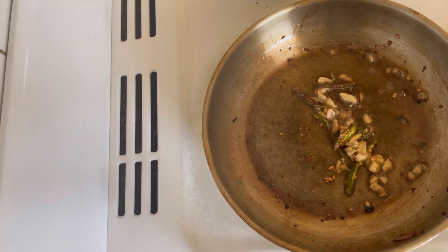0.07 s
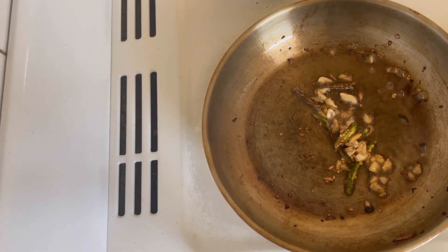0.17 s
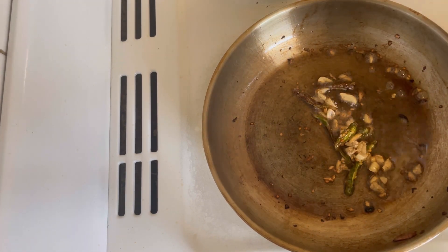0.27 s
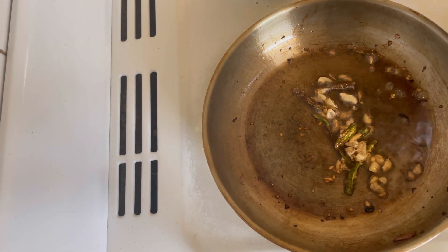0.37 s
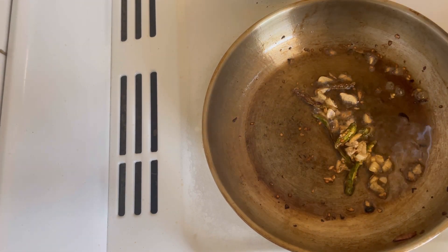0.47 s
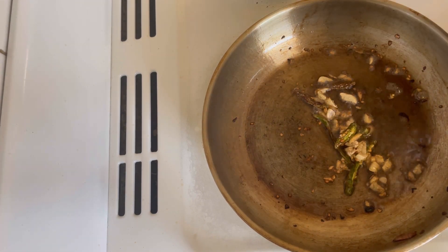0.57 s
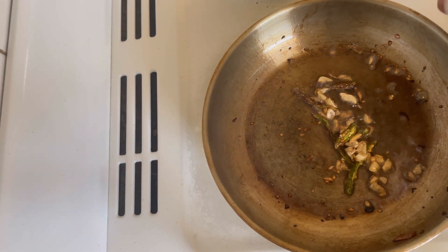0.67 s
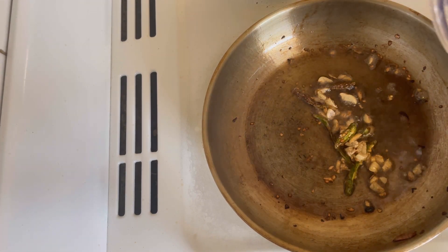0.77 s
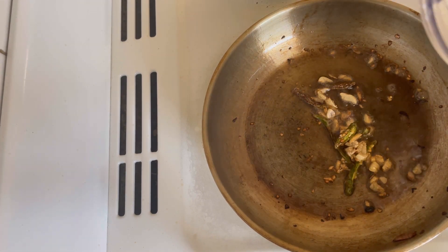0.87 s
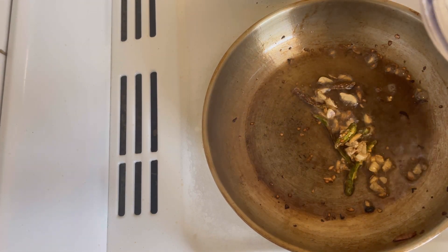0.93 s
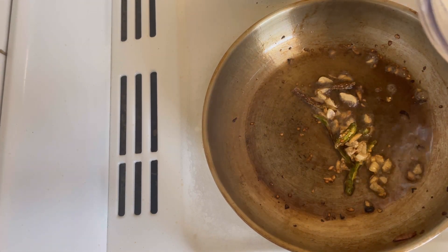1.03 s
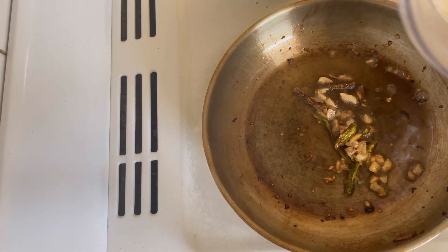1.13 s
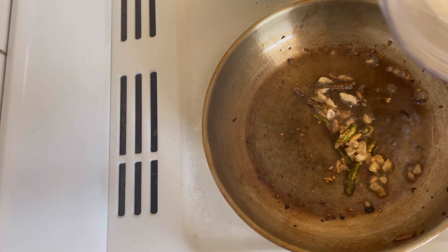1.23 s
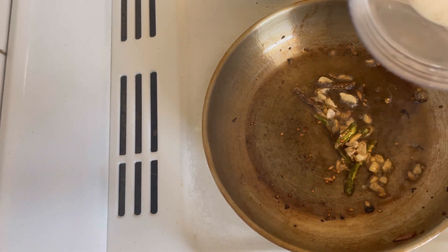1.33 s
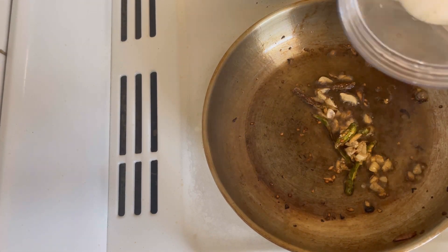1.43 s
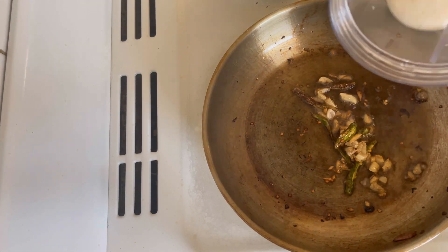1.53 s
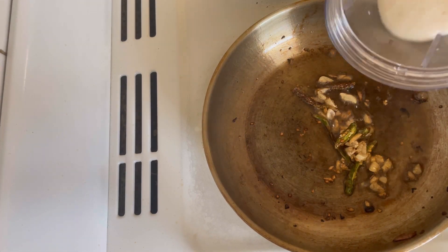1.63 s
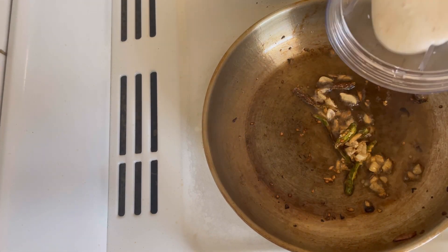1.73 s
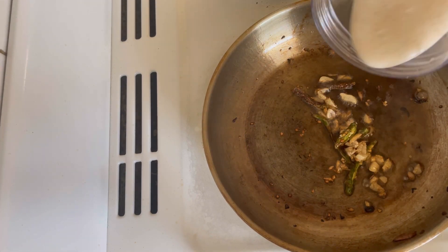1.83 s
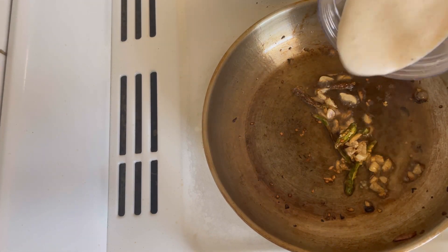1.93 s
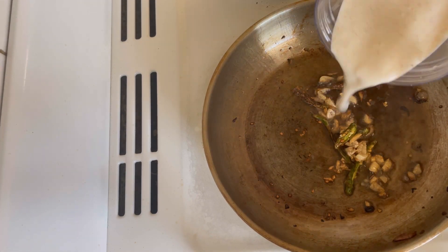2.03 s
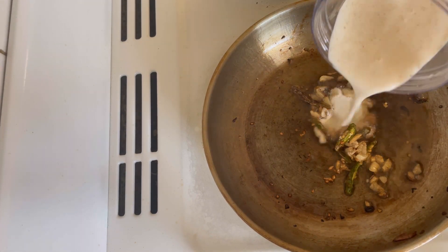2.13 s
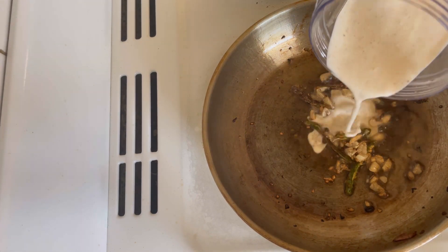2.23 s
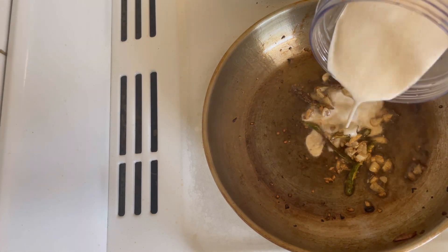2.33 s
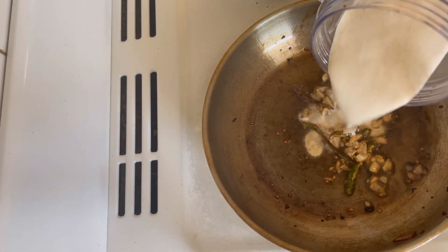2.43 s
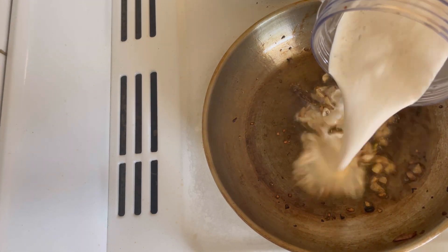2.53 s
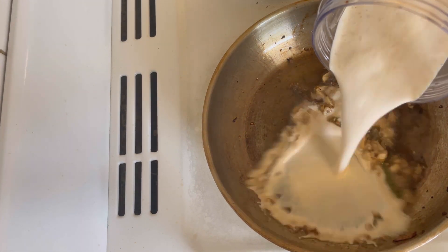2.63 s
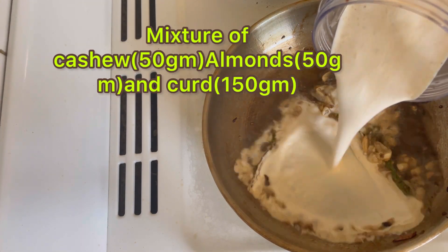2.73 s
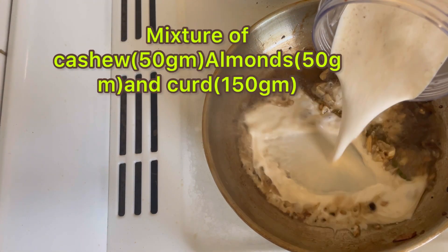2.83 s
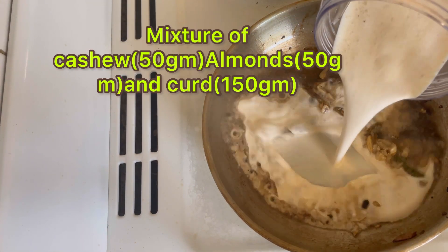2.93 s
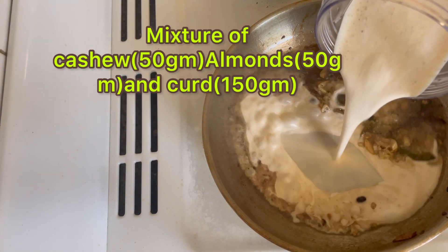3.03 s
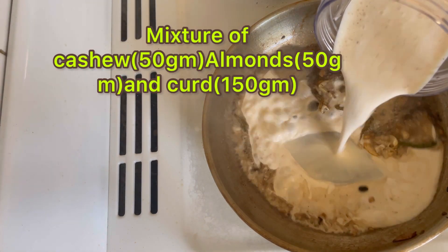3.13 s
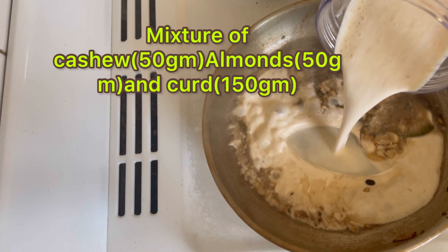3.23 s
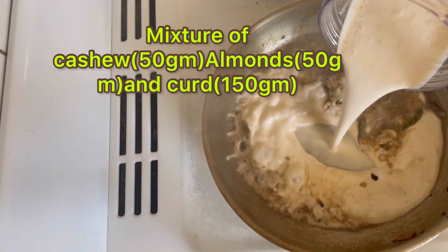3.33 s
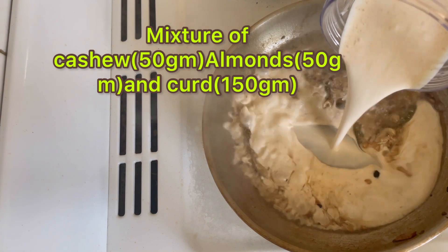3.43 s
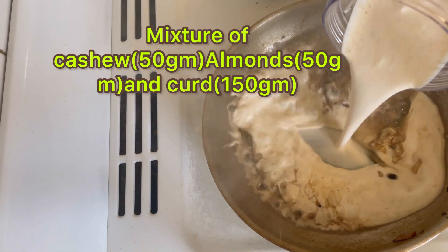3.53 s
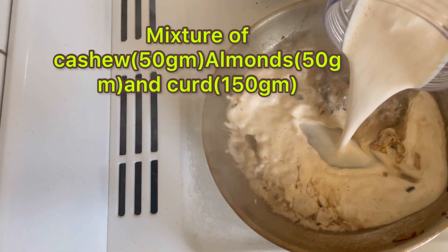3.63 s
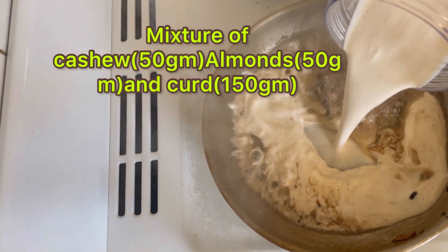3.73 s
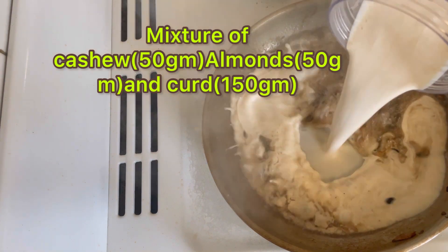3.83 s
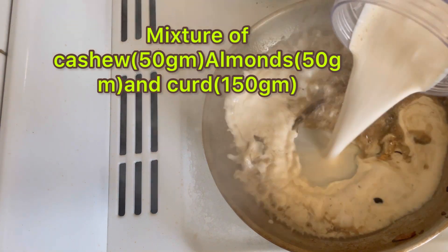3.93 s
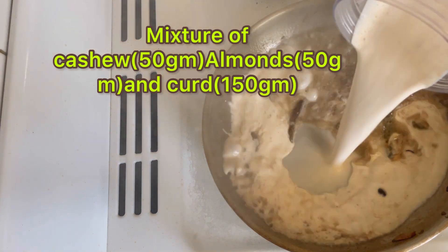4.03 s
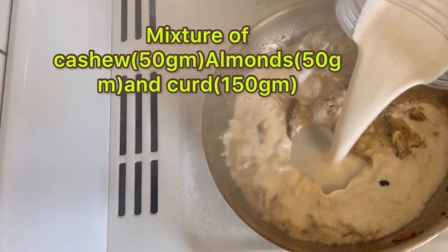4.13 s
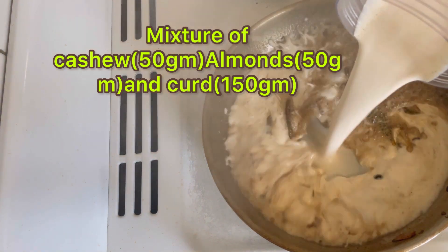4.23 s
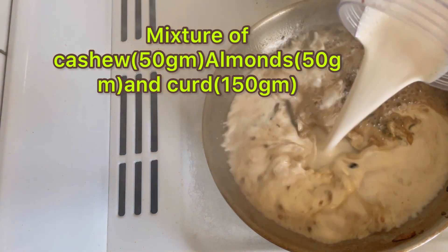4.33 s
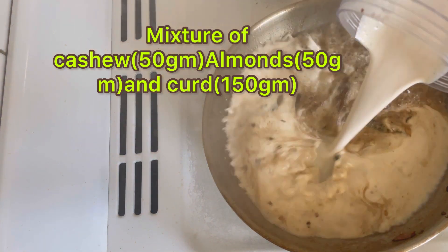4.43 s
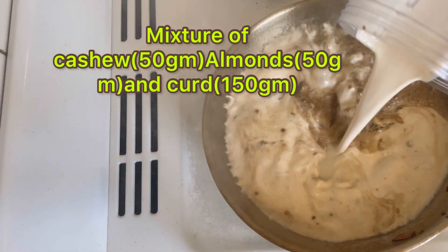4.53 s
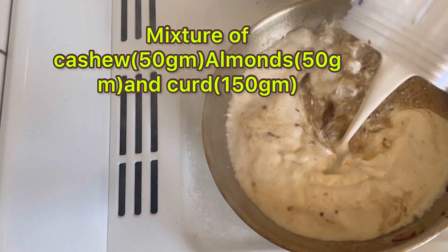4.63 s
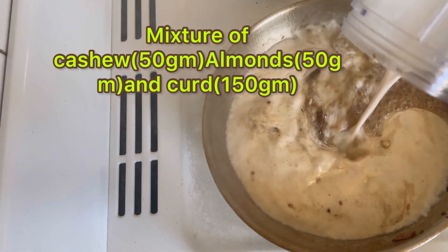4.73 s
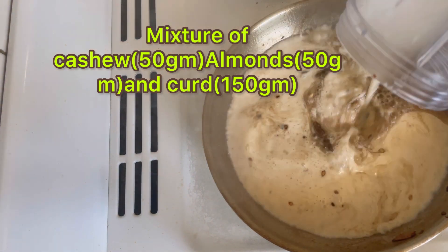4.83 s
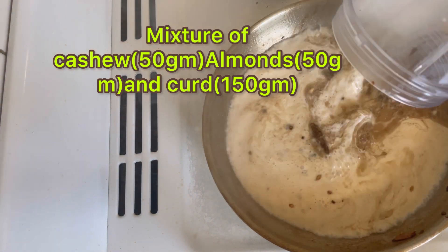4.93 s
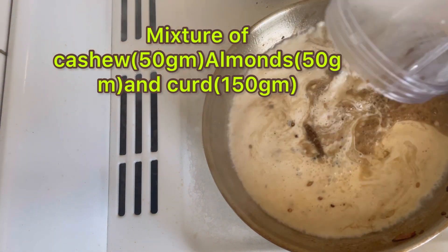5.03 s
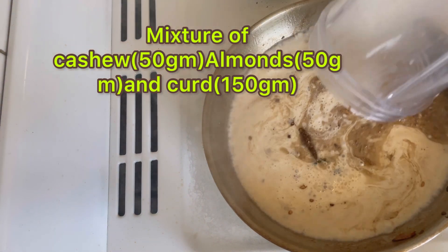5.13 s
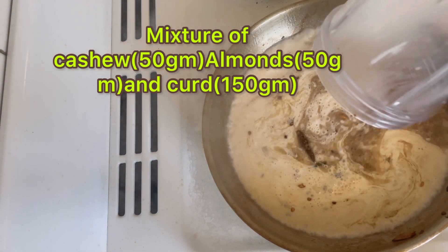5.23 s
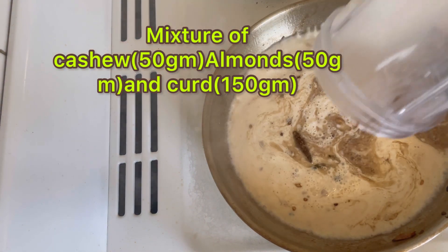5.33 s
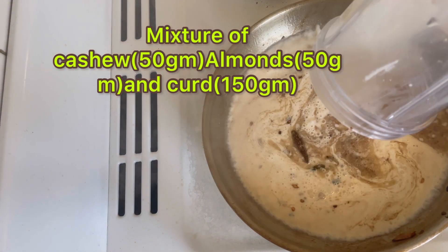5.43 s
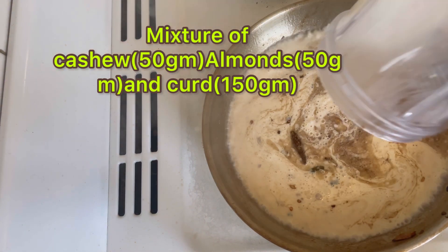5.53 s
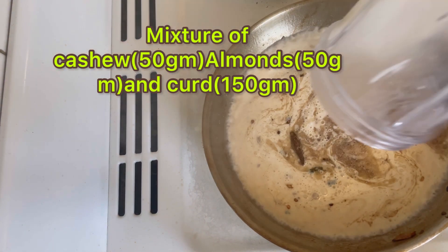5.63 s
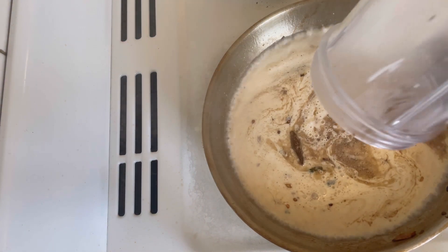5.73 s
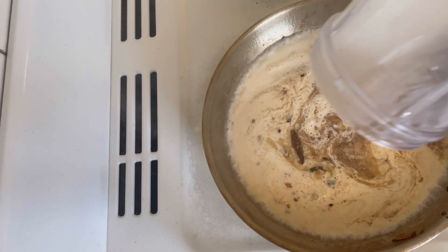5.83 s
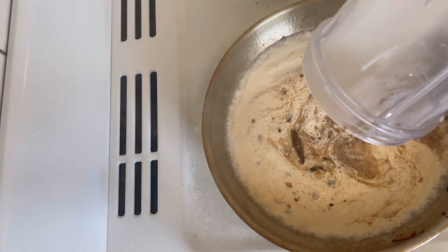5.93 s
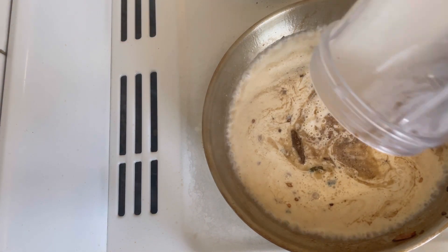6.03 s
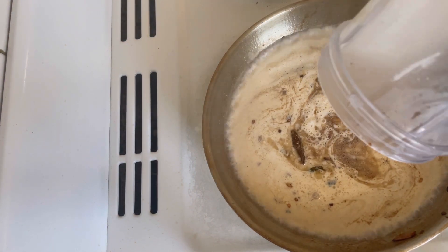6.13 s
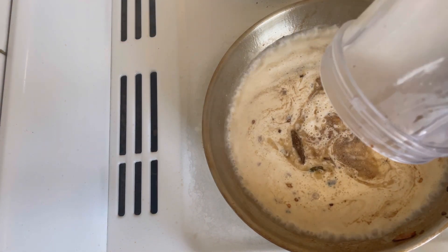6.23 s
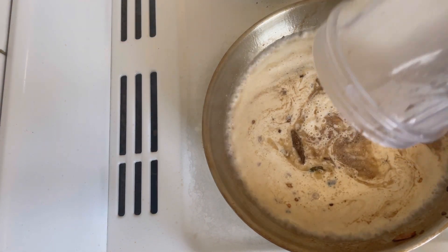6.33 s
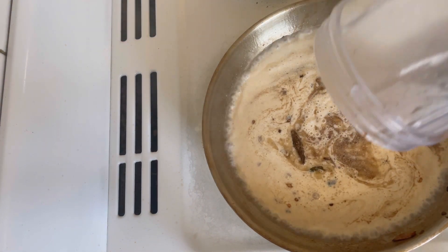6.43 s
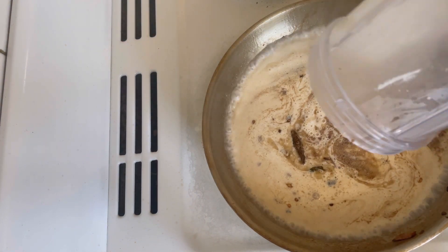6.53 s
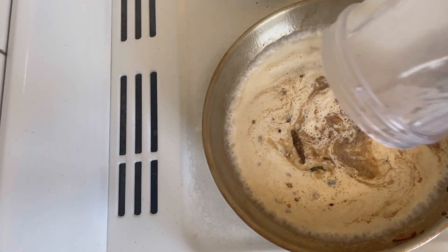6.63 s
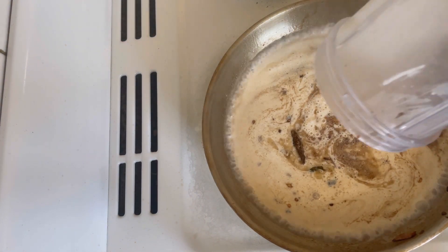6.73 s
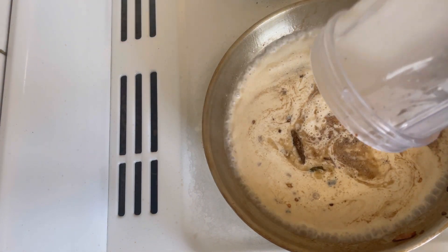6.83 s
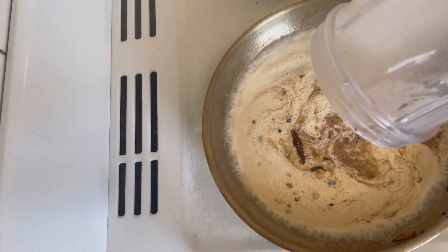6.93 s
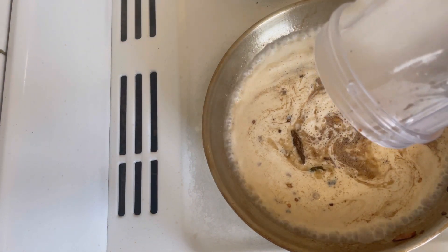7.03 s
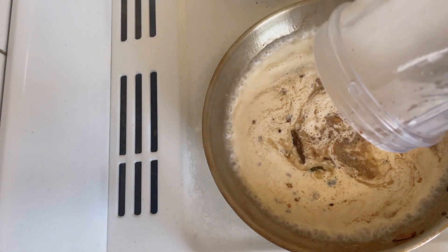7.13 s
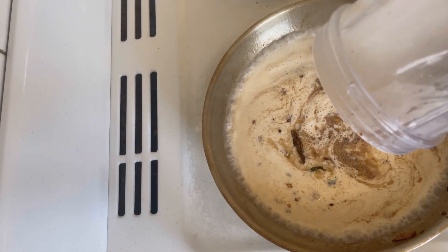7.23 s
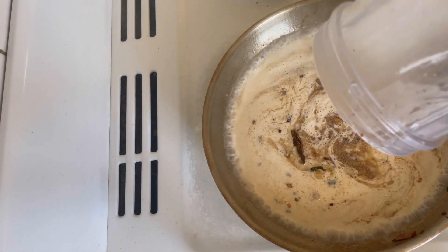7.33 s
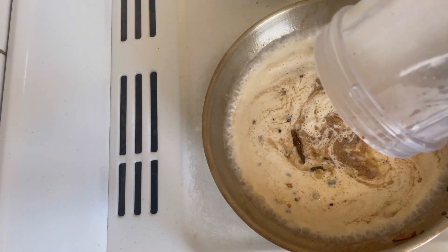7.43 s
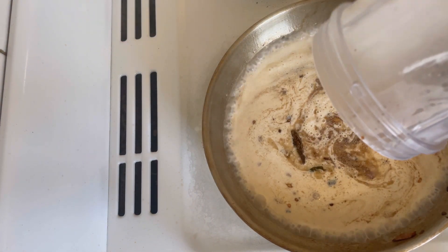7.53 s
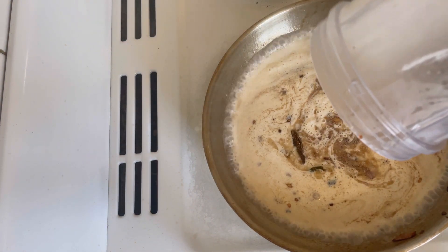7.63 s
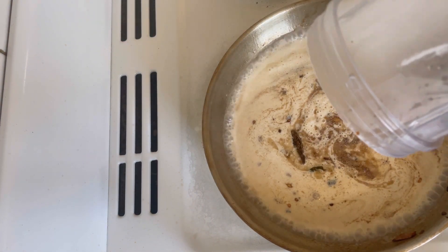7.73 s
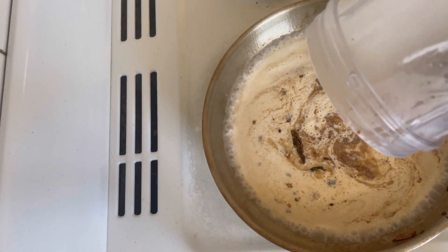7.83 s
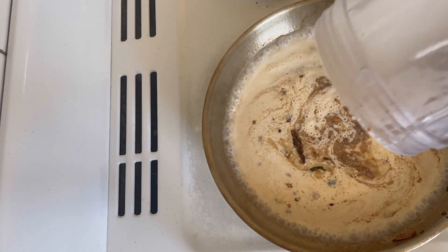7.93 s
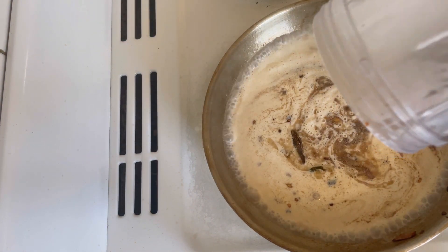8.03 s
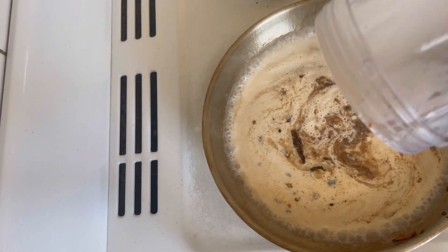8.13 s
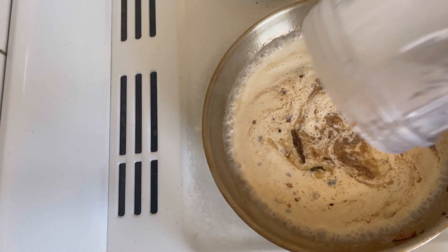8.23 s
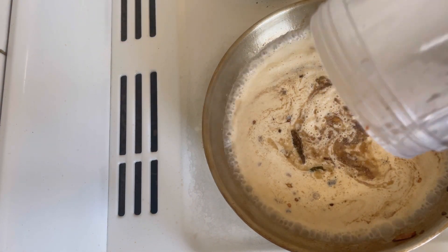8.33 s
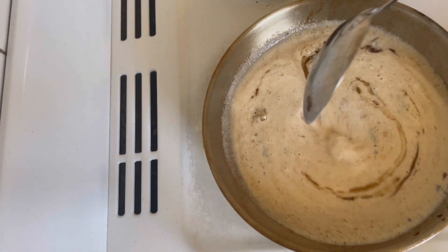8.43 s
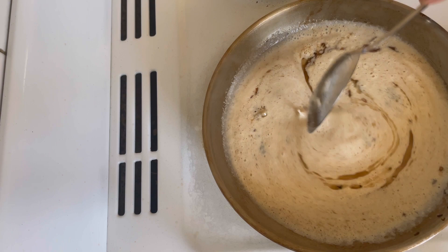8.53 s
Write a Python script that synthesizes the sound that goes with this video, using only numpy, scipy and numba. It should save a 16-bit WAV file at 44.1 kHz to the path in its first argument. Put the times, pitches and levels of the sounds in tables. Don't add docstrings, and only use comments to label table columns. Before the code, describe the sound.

Close above a steel pan in a small kitchen, hot oil sizzles softly with occasional spits. Dull jar knocks come before a cold thick paste is poured in. It bursts into loud, bright, crackling steam with bubbling beneath, peaks quickly, then fades steadily to a gentle fizz. A low cooker hood rumbles faintly. At the end an abrupt cut leaves very quiet stirring.

```python
import sys
import numpy as np
from scipy import signal
from scipy.fft import rfft, irfft, next_fast_len
from scipy.io import wavfile
from scipy.ndimage import uniform_filter1d
from numba import njit

SR = 44100
rng = np.random.default_rng(int(sys.argv[2]) if len(sys.argv) > 2 else 0)


def volts_from_db(level):
    exponent = np.asarray(level, float) / 20
    return 10 ** exponent


def waveform_to_disk(signal):
    frames = np.transpose(np.atleast_2d(signal))
    scaled = np.clip(frames, -1, 1) * 32767
    samples = np.round(scaled).astype(np.int16)
    wavfile.write(sys.argv[1], SR, samples)


N = 378819
JUMP_S = 8.3745

# pitch_hz, level_db
GURGLE_COLOUR = [(15, -48), (25, -19), (107, -3.5), (205, -3.5), (340, -3), (423, -1), (503, -2),
                 (599, -0.5), (800, -12.5), (1040, -33), (1760, -120)]


def unit(x):
    return x / np.sqrt(np.mean(x ** 2))


def colour(x, points):
    hz, db = np.transpose(points)
    size = next_fast_len(len(x), True)
    f = np.arange(size // 2 + 1) * SR / size + 1
    gain = volts_from_db(np.interp(np.log(f), np.log(hz), db))
    return irfft(rfft(x, size) * gain, size)[:len(x)]


def walk(rate_hz):
    hold = int(SR / rate_hz)
    steps = np.repeat(rng.standard_normal(N // hold + 1), hold)
    return 0.87 * uniform_filter1d(uniform_filter1d(steps, hold), hold)[:N]


@njit
def rings(start, hz, t60, size, glide):
    out = np.zeros(N)
    for k in range(len(start)):
        n = int(t60[k] * SR) + 2
        step = np.exp(2j * np.pi * hz[k] / SR - np.log(1000) / n)
        rise = np.exp(2j * np.pi * hz[k] * glide / SR / n)
        z = size[k] + 0j
        for i in range(int(start[k]), min(int(start[k]) + n, N)):
            out[i] += z.imag
            z, step = z * step, step * rise
    return out


def bubbles(points, count, cycles, spread_db, hiss_db, flutter_db):
    when, pitch, luck = rng.random((count, 3)).T
    low_hz, high_hz = points[1][0], min(points[-2][0], 0.4 * SR)
    hz = low_hz * (high_hz / low_hz) ** pitch
    size = hz * volts_from_db(-spread_db * np.log(1 - 0.9995 * luck))
    swarm = unit(rings(when * N, hz, cycles / hz, size, 0.39))
    mix = unit(colour(swarm + volts_from_db(hiss_db) * rng.standard_normal(N), points))
    rows = np.array([mix, np.roll(mix, N // 3), np.roll(mix, -N // 3)])
    return rows * volts_from_db(flutter_db * walk(22.036))


def family(name):
    # bare_oil_db, full_steam_db, slope [dB per dB of steam],
    # held_back_db (before the flood), roll_db (won in the roll), stirred_db
    families = dict(fizz=(-49.5, -29, 1.0049, 1, -0.5, -65.5), spray=(-50.5, -32, 0.95, 1.3, .1, -66.5),
                froth=(-59.5, -33.5, 0.97, -6, -0.2, -67.5), boil=(-57.5, -36, 0.83, 1.7, 2.5, -68.5),
                gurgle=(-77, -51.5, 0.47, -3.5, 1.5, -72))
    arrivals = dict(fizz=2.07, spray=2.07, froth=2.155, boil=2.17, gurgle=2.21)
    # time_s, level_db
    steam = [(2.07, -47), (2.12, -26.5), (2.23, -28), (2.255, -24.5), (2.31, -27), (2.45, -23.5),
             (2.53, -23), (2.59, -21), (2.72, -20), (2.87, -21.5), (3.2, -21), (3.36, -22), (3.85, -28),
             (4.5, -31), (4.7, -32.5), (6.4, -40), (7, -41.5), (8.37, -43)]
    full_steam_db = -24
    pour_s, smother_s = 2.17, 0.5
    flood_s, flood_rise_s = 2.54, 0.062
    roll_s, roll_width_s = 3.9, 0.57
    arrive_db_per_s = 450
    stir_rise_db_per_s = 47

    oil_db, full_db, slope, held_db, roll_db, stir_db = families[name]
    t = np.arange(N) / SR
    paste_db = full_db + slope * (np.interp(t, *np.transpose(steam)) - full_steam_db)
    paste_db += arrive_db_per_s * np.minimum(t - arrivals[name], 0)
    paste_db += held_db * np.clip(1 - (t - flood_s) / flood_rise_s, 0, 1)
    paste_db += roll_db * np.exp(-((t - roll_s) / roll_width_s) ** 2)
    oil = volts_from_db(oil_db) * np.clip(1 - (t - pour_s) / smother_s, 0, 1)
    cooking = np.hypot(oil, volts_from_db(paste_db))
    stirring = volts_from_db(stir_db - stir_rise_db_per_s * (N / SR - t))
    return np.where(t < JUMP_S, cooking, stirring)


def sizzle():
    # pitch_hz, level_db
    spray_colour = [(5500, -49), (7500, 2.5), (9000, -1.5), (10300, 0), (12000, -3.5), (13500, -6),
                    (15500, -0.5), (20000, -3)]
    fizz_colour = [(2400, -27.5), (3500, -6), (4300, -2.5), (4750, -2.5), (5100, 0), (5500, -1), (6200, -1),
                   (7200, -4), (9000, -14), (11000, -29)]
    froth_colour = [(1200, -33), (1700, -2), (2250, -3), (2500, -1.5), (2780, 0), (3050, -0.5), (3350, -3),
                    (3900, -6), (5000, -24)]
    boil_colour = [(300, -24.5), (600, -11), (850, -8.5), (1000, -2.5), (1120, -2.5), (1300, 0),
                   (1500, 0.5), (1800, -13), (2400, -20.5)]
    fizz = bubbles(fizz_colour, count=30000, cycles=9.3, spread_db=2.0, hiss_db=3.0, flutter_db=1.17)
    spray = bubbles(spray_colour, count=40000, cycles=7.5, spread_db=2.5, hiss_db=2.5, flutter_db=0.3)
    froth = bubbles(froth_colour, count=14000, cycles=10.5, spread_db=1.64, hiss_db=5.5, flutter_db=0.7)
    boil = bubbles(boil_colour, count=9000, cycles=9.2, spread_db=0.23, hiss_db=8.0, flutter_db=0.2)
    out = family("fizz") * volts_from_db(2.5) * fizz
    out = out + family("spray") * volts_from_db(6.5) * spray
    out = out + family("froth") * volts_from_db(3.0) * froth
    out = out + family("boil") * volts_from_db(0.5) * boil
    return volts_from_db(0.63 * walk(16)) * out


def hood():
    # pitch_hz, level_db
    hood_colour = [(15, -36), (25, -8), (76, 5), (98, 6), (161, -18), (300, -15), (390, -41), (660, -120)]
    level_db = -71 + 7.1 * (np.arange(N) > JUMP_S * SR) + 0.5 * walk(3.4)
    return volts_from_db(level_db) * unit(colour(rng.standard_normal(N), hood_colour))


def spits(rows, t60, ring_db, crack_db, edge_db):
    out, t = np.zeros(N + 2048), np.arange(2048) / SR
    click = 1.0 * (np.arange(64) == 32)
    crack = unit(colour(click, [(4000, -26), (7500, -7), (10000, -4.5), (12500, -6.5), (16000, -32)]))
    edge = unit(colour(click, [(9000, -38), (12500, -2), (16500, -1), (18500, -30)]))
    fall = volts_from_db(-60 * t / t60) + 0.89 * volts_from_db(-60 * t / 0.0087)
    for s, db, hz, click_db in rows:
        throat = [(hz / 5, -30), (hz / 1.43, -18), (hz, 0), (hz * 1.57, -24)]
        start = int((s + 0.0016) * SR)
        ring = unit(colour(rng.standard_normal(len(t)), throat))
        out[start:start + len(t)] += ring * volts_from_db(db + ring_db) * fall
        snap = crack * volts_from_db(click_db + crack_db) + edge * volts_from_db(click_db + edge_db)
        tears = 0.3 * rng.standard_normal(63) * volts_from_db(-60 * t[:63] / 0.003)
        out[start - 24:start + 103] += np.convolve(snap, np.r_[1, tears])
    return out[:N]


def knocks():
    # start_s, peak_db, pitch_hz, t60_s
    hits = [(0.469, -52, 100, 0.15), (0.521, -51, 105, 0.18), (.63, -54, 110, 0.11), (1.2, -60, 335, .1),
            (1.22, -47, 510, 0.11), (1.3, -54, 433, 0.076), (1.735, -40.5, 590, 0.066),
            (1.742, -51.5, 233, 0.33), (1.784, -49, 560, 0.079), (1.815, -43, 3810, .15),
            (2.065, -52, 190, 0.092), (2.069, -39, 1060, 0.037), (2.499, -43, 75, 0.23),
            (2.335, -25.5, 3300, 0.22), (2.365, -22.5, 3380, 0.087)]
    rattle_db, rattle_t60_s = -16, 0.28
    s, db, hz, t60 = np.transpose(hits)
    shake = np.zeros(N)
    shake[(s * SR).astype(int)] = volts_from_db(db + rattle_db) * (hz < 700)
    shake = signal.lfilter([1], [1, -volts_from_db(-60 / rattle_t60_s / SR)], shake)
    rumble = shake * unit(colour(rng.standard_normal(N), GURGLE_COLOUR))
    return rings(s * SR, hz, t60, volts_from_db(db), 0.036) + rumble


def gurgle():
    swarm = bubbles(GURGLE_COLOUR, count=1500, cycles=10.5, spread_db=0.5, hiss_db=13.5, flutter_db=-0.3)
    return family("gurgle") * volts_from_db(1.5) * swarm


def ports(spread, pops):
    # pitch_hz, left_lead_rad, straight_share [0-1, straight from the pan]
    port_table = [(20, -1.5, .9995), (90, 0.5, .997), (200, 0.08, 1), (400, 0.5, 0.82), (645, 0.45, 0.55),
                  (990, 0.15, 0.75), (1920, -0.5, 1), (2530, .5, 0.47), (4350, 0.92, 0.53),
                  (4900, -0.17, 0.89), (5610, 1.0, 0.94), (8210, 3.5, 0.96), (10170, 6, 0.56),
                  (13940, 9, 0.98), (15800, 10, 0.5)]
    # pitch_hz, width_hz, boost_db
    pan_modes = [(216.7, 19, 5.5), (616, 29, 5.5), (684, 20, 6.5), (850.5, 40, 9), (1045, 20, 1),
                 (1122, 29, 6), (2253, 73, 4.5), (2460, 43, 3.5), (2770, 60, 3.5), (3290, 51, 4),
                 (3825, 110, 5), (4320, 53, -1), (5040, 82, 3.5), (5640, 60, 1), (10050, 50, -6),
                 (10900, 64, -3)]
    ring_t60_s = 0.053

    size = next_fast_len(N + 4096, True)
    f = np.arange(size // 2 + 1) * SR / size
    hz, lead, share = np.transpose(port_table)
    lead = np.interp(f, hz, lead)
    share = np.clip(np.interp(f, hz, share), 0, 1)
    steel = volts_from_db(sum(db / (1 + (2 * (f - mode_hz) / width) ** 2) for mode_hz, width, db in pan_modes))
    t = np.arange(4096) / SR
    tail = rng.standard_normal((2, len(t))) * volts_from_db(-60 * t / ring_t60_s) * (t > 0.0008)
    tail = rfft(tail / np.sqrt(np.sum(tail ** 2, axis=1, keepdims=True)), size)

    both, *own = rfft(spread, size) * steel
    pops = rfft(pops, size)
    straight = np.sqrt(share) * np.exp(0.5j * np.array([lead, -lead])) * (both + pops)
    around = np.sqrt(1 - share)
    near = straight + around * (volts_from_db(-2.5) * np.array(own) + volts_from_db(0.5) * tail * pops)
    near = irfft(near, size)[:, :N]
    echo = irfft(around * volts_from_db(-4.5) * tail * both, size)[:, :N]
    return near + echo * (np.arange(N) < JUMP_S * SR)


def scene():
    # start_s, ring_db,
    # ring_hz, crack_db
    sharp_spits = [(0.0868, -34, 5220, -42), (0.4097, -45, 4900, -42), (0.4907, -31, 5170, -31.5),
                   (0.5318, -42, 5460, -42), (0.6265, -32, 4880, -39), (0.6439, -24, 5230, -35),
                   (0.671, -40, 5210, -45.5), (1.0649, -35, 5090, -54), (1.1696, -15.5, 5940, -40),
                   (1.263, -31, 5850, -49), (1.3245, -26, 5900, -49), (1.5104, -40, 4970, -40),
                   (1.5485, -13.5, 4400, -53), (1.5547, -24, 4420, -55), (1.5647, -28, 4230, -52),
                   (1.662, -43, 5090, -41), (1.725, -25.5, 5060, -37), (1.7625, -28, 5200, -45),
                   (1.7772, -17, 5540, -44), (1.7867, -22, 5700, -34), (1.8605, -21.5, 5100, -50),
                   (1.9854, -28, 5100, -47), (2.0282, -38, 5870, -52), (7.8851, -29, 5400, -54),
                   (8.4213, -49, 5610, -68), (8.5599, -51, 5340, -64)]
    # start_s, ring_db, ring_hz, crack_db
    seed_snaps = [
        (0.4617, -33, 5040, -34.5),
        (1.3717, -30, 6180, -38.5),
    ]
    # start_s, ring_db, ring_hz, crack_db
    steam_bursts = [(2.2543, -7.5, 5100, -21), (2.2864, -10, 6480, -26), (2.3211, -13.5, 3430, -25),
                    (2.385, -15, 5050, -32), (2.4404, -10, 4560, -27), (2.4759, -13, 5210, -29),
                    (2.5171, -10, 5000, -25), (2.5724, -25, 5640, -21), (2.6372, -16, 5120, -32),
                    (2.6675, -2.5, 4570, -30), (2.704, -7.5, 5240, -33), (2.8015, -7, 5100, -31),
                    (2.8372, -11, 5100, -19), (3.0101, -7.5, 4590, -30), (3.1722, -15, 5150, -31),
                    (3.3074, -19, 5110, -25), (3.4252, -10.5, 5090, -31), (3.8776, -23, 5180, -36),
                    (4.5695, -19, 5350, -33), (4.849, -22, 5110, -37)]
    pops = spits(sharp_spits, t60=0.032, ring_db=-10.5, crack_db=4.0, edge_db=-3)
    pops = pops + spits(seed_snaps, t60=0.028, ring_db=-10.5, crack_db=3.5, edge_db=4)
    pops = pops + spits(steam_bursts, t60=0.016, ring_db=-10.0, crack_db=2.5, edge_db=-16)
    heard = ports(sizzle() + hood() + gurgle(), pops + knocks())
    since = np.arange(N) / SR - JUMP_S
    fade_in = np.where(since > 0, np.clip(since / 0.016, 0.05, 1) ** 2, 1)
    return fade_in * heard


def roll_off(x):
    return signal.sosfilt(signal.butter(12, 17160, fs=SR, output="sos"), x)


def record(dry):
    # low_hz, high_hz
    mid_gaps = [(7050, 8180), (13800, 14950)]
    side_gaps = [(10400, 11650)]
    # low_hz, high_hz
    patchy_gap = (1600, 2200)
    top_hz, click_top_hz = 15750, 16900

    size = next_fast_len(N, True)
    f = np.arange(size // 2 + 1) * SR / size
    bass_loss = 1 + (38 / (f + 1)) ** 4
    left, right = rfft(dry, size) * (f < click_top_hz) / bass_loss
    mid, side = (left + right) / 2, (left - right) / 2
    lost_mid = np.any([(f > a) & (f < b) for a, b in mid_gaps] + [f > top_hz], axis=0)
    lost_side = np.any([(f > a) & (f < b) for a, b in side_gaps] + [f > top_hz], axis=0)
    patch = side * (f > patchy_gap[0]) * (f < patchy_gap[1])
    bands = np.array([mid, side, mid * lost_mid, side * lost_side, patch])
    mid, side, weak_mid, weak_side, patch = irfft(bands, size)[:, :N]

    power = np.sum(np.gradient(dry, axis=1) ** 2, axis=0)
    click = uniform_filter1d(power, size=24) > volts_from_db(27) * uniform_filter1d(power, size=2048)
    near_click = np.minimum(100 * uniform_filter1d(1.0 * click, size=400), 1)
    drop = 1 - uniform_filter1d(near_click, size=256)
    patch_gone = uniform_filter1d(1.0 * (walk(40) > -0.45), size=512)
    side = side - drop * weak_side - patch * patch_gone
    mid = mid - drop * weak_mid
    return roll_off(np.array([mid + side, mid - side]))


dry = scene()
out = record(dry)
waveform_to_disk(out)
```